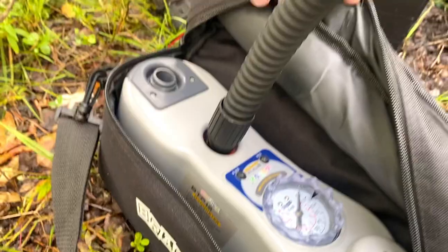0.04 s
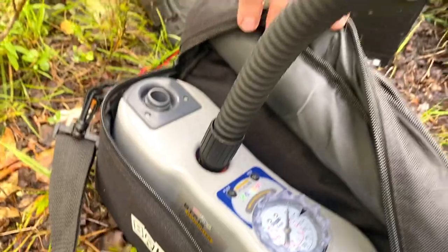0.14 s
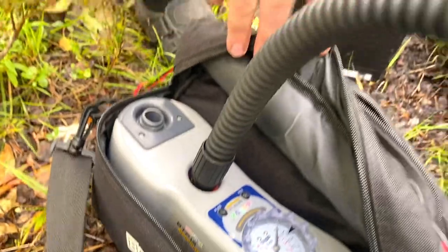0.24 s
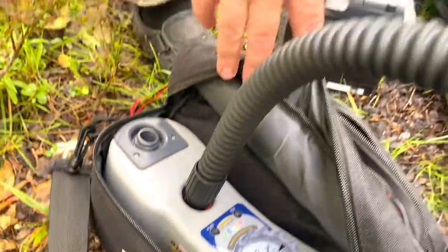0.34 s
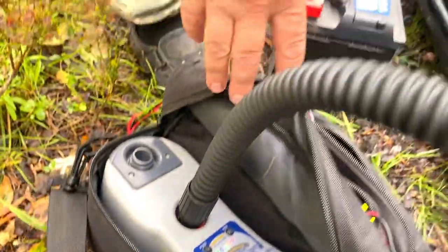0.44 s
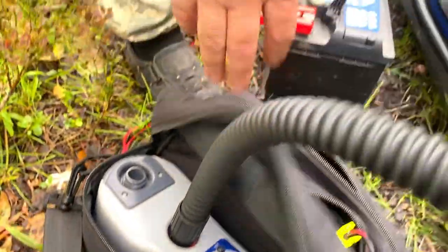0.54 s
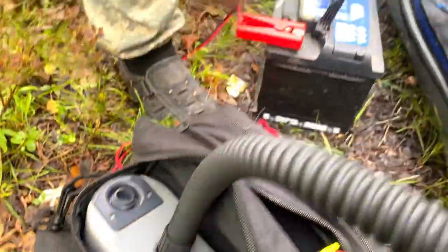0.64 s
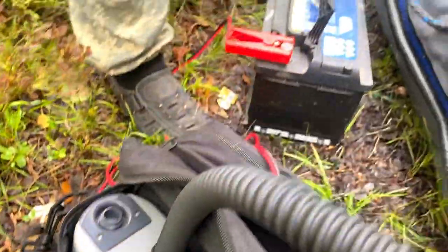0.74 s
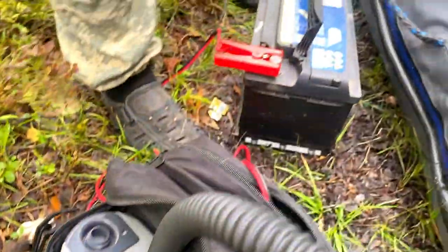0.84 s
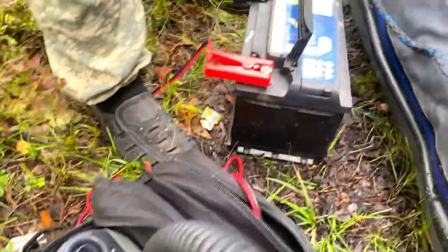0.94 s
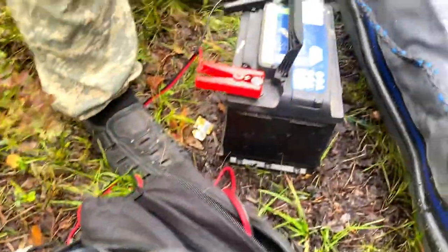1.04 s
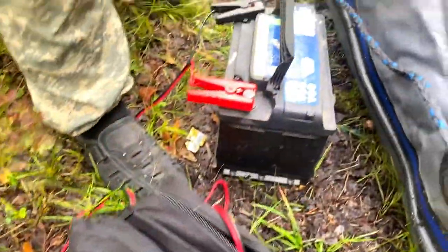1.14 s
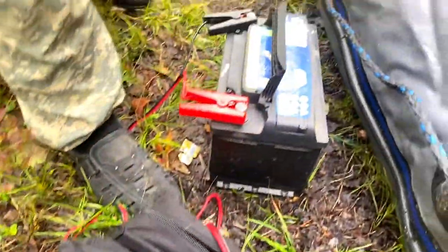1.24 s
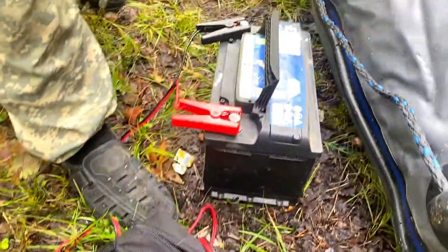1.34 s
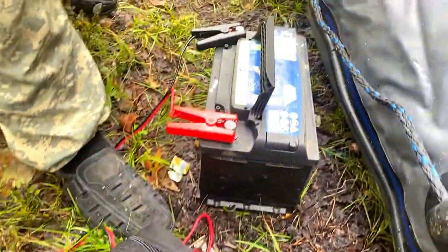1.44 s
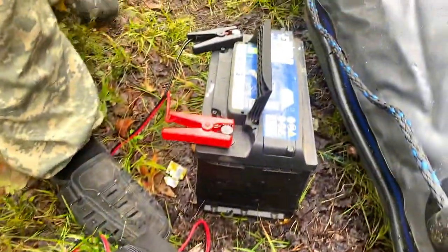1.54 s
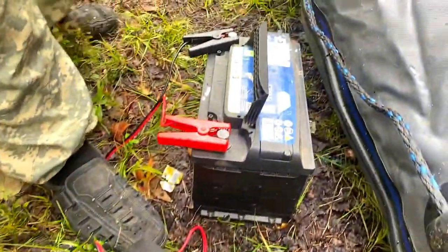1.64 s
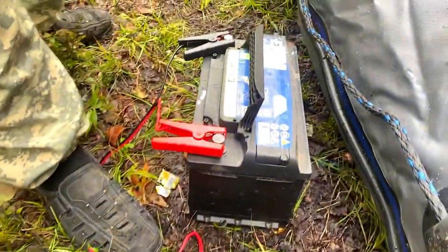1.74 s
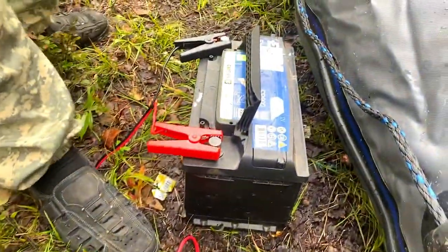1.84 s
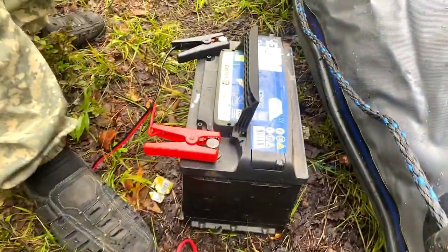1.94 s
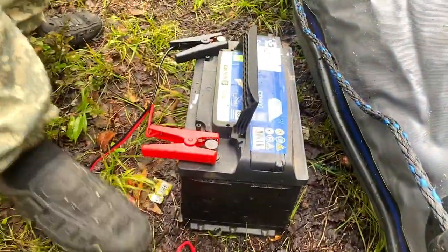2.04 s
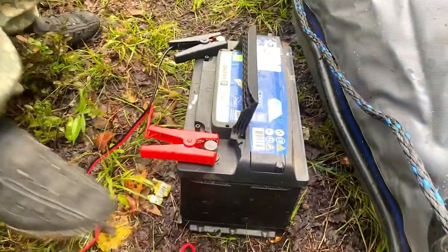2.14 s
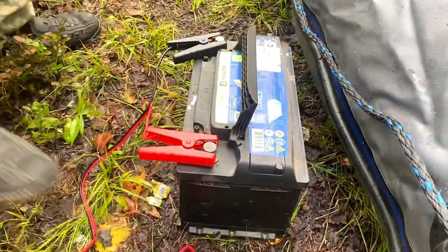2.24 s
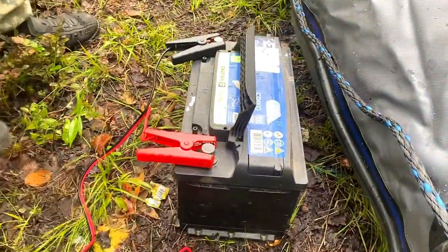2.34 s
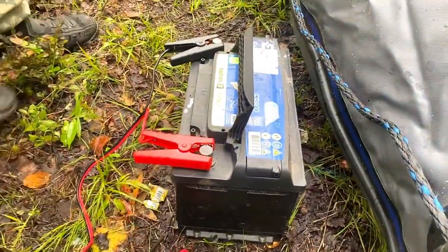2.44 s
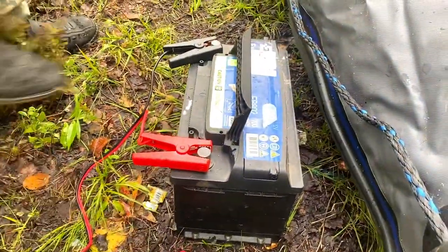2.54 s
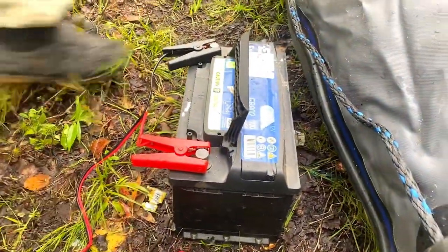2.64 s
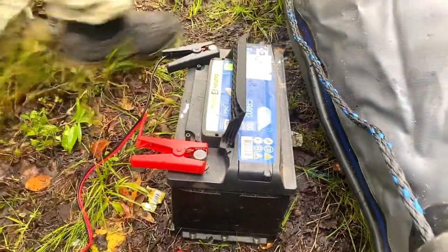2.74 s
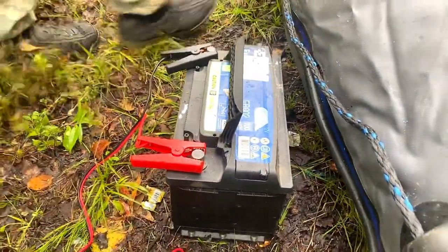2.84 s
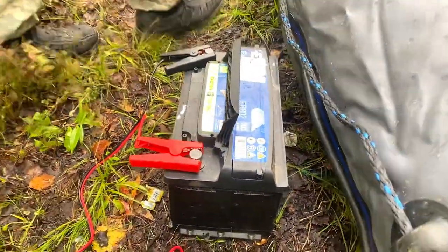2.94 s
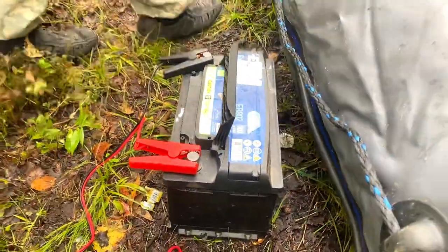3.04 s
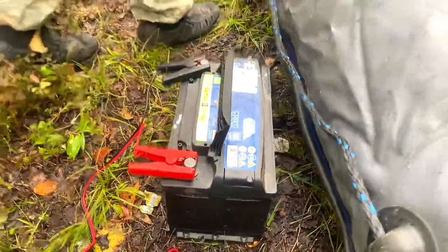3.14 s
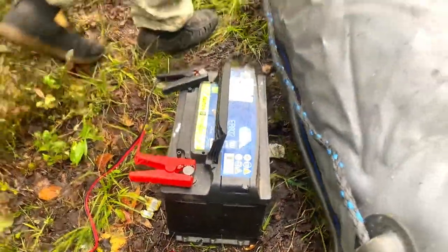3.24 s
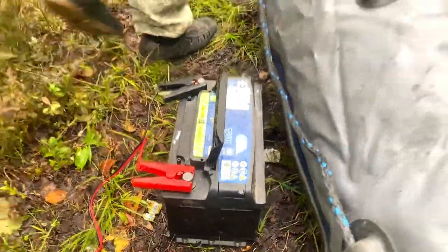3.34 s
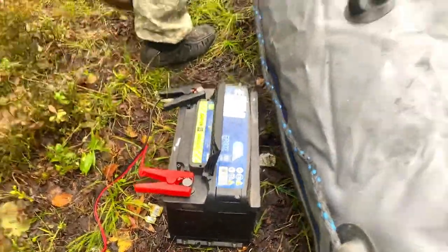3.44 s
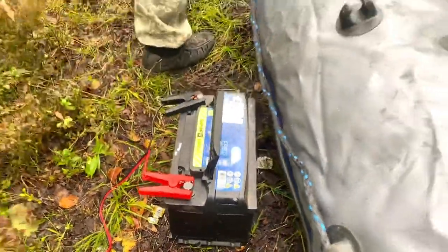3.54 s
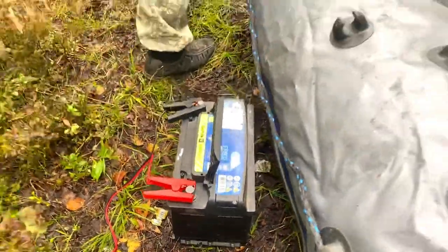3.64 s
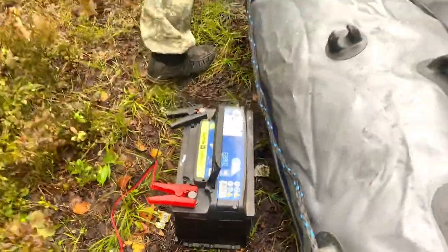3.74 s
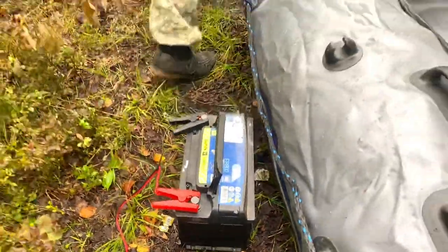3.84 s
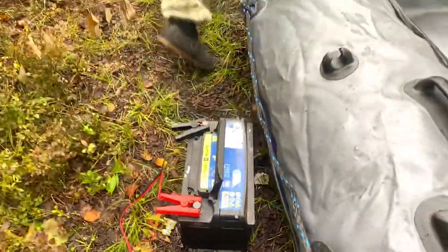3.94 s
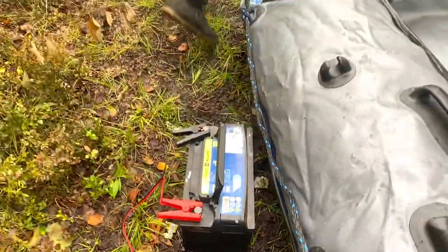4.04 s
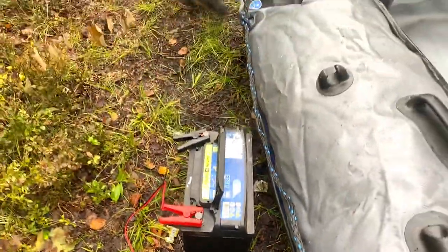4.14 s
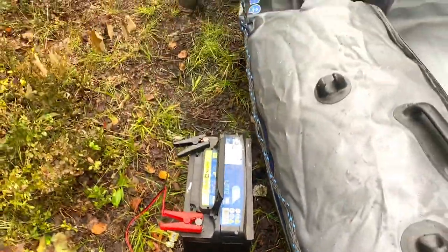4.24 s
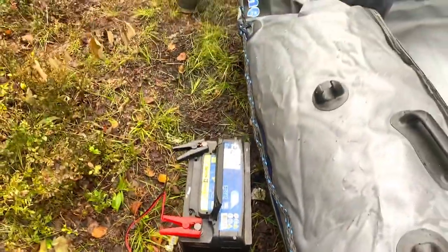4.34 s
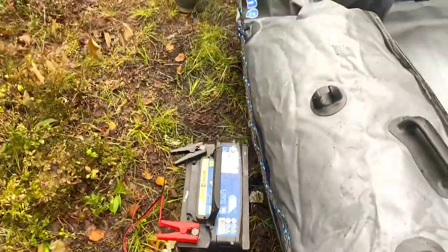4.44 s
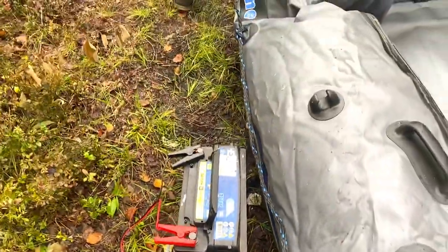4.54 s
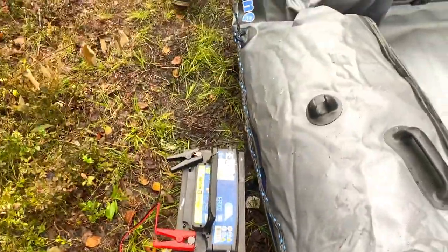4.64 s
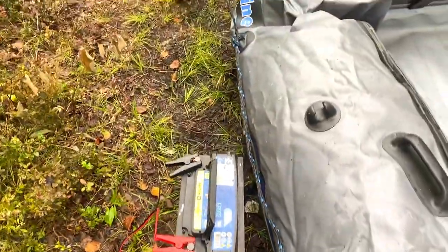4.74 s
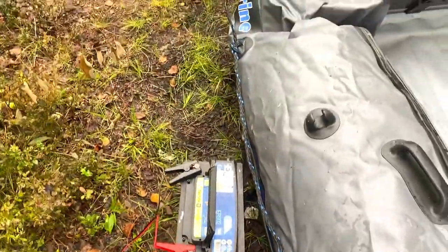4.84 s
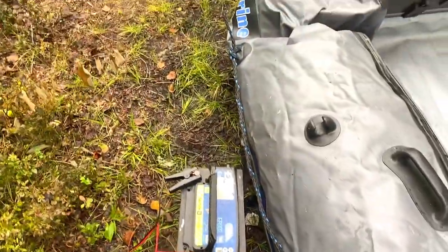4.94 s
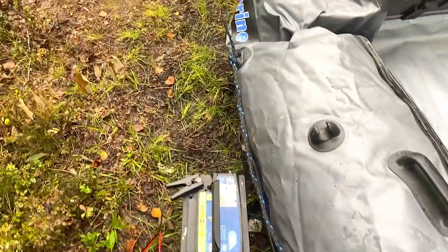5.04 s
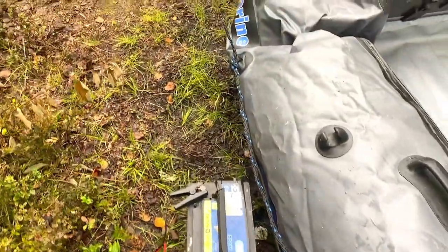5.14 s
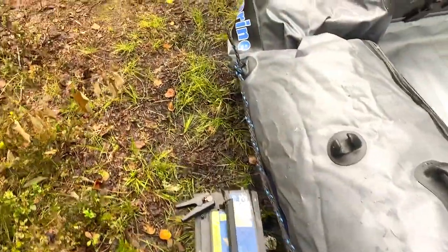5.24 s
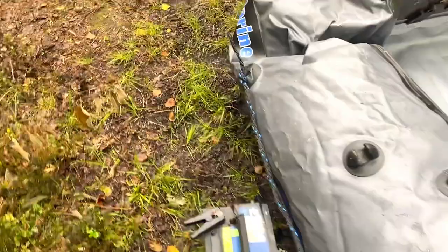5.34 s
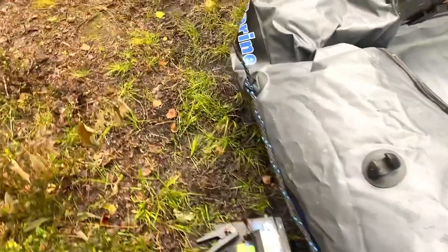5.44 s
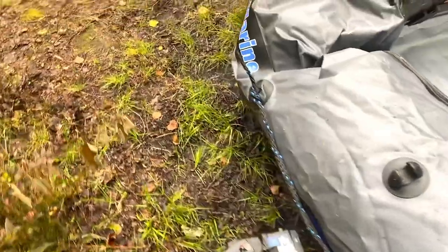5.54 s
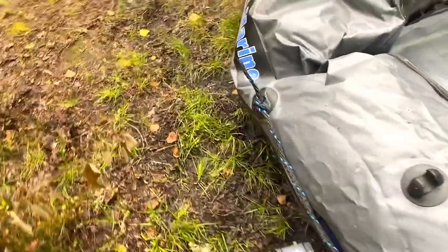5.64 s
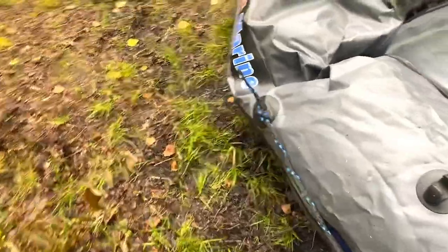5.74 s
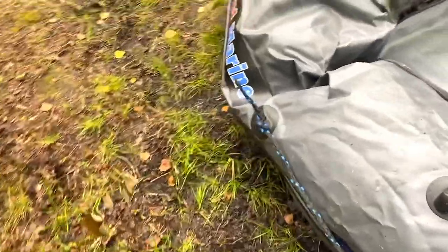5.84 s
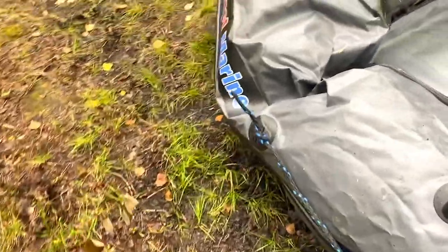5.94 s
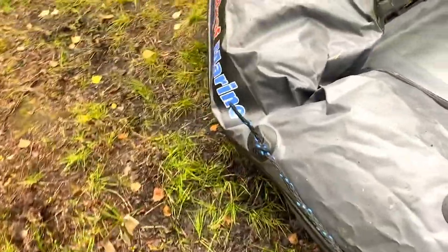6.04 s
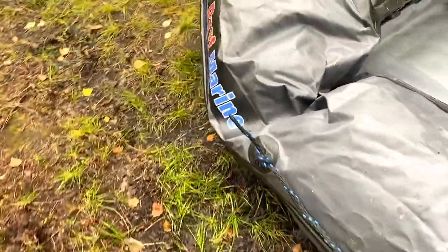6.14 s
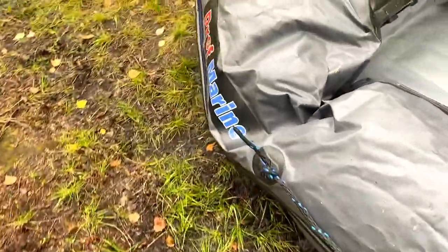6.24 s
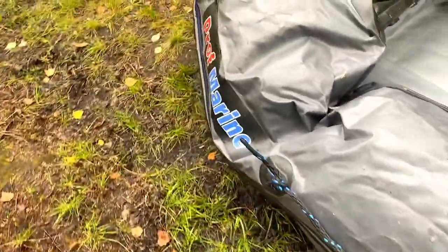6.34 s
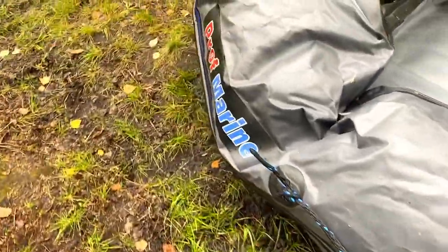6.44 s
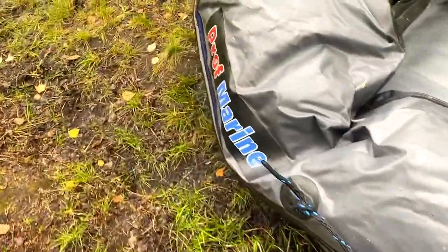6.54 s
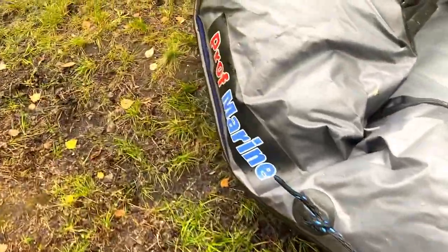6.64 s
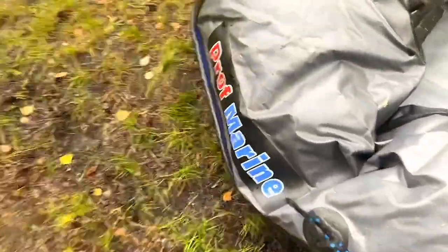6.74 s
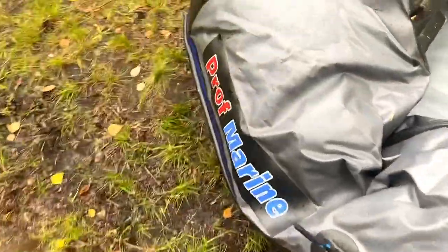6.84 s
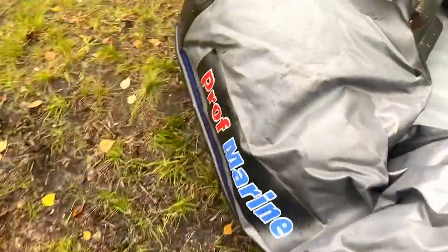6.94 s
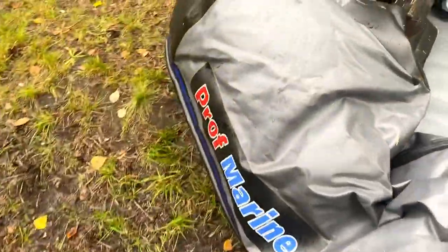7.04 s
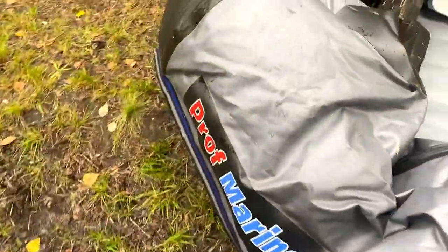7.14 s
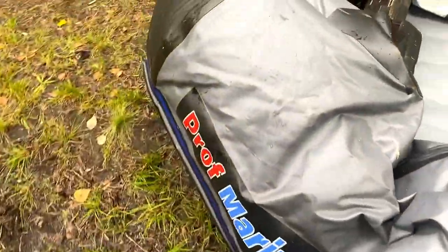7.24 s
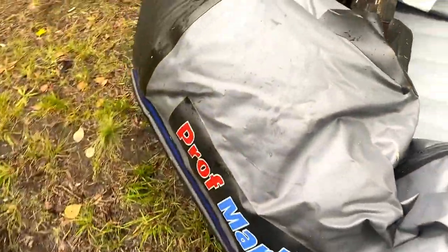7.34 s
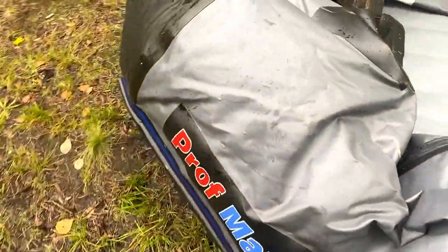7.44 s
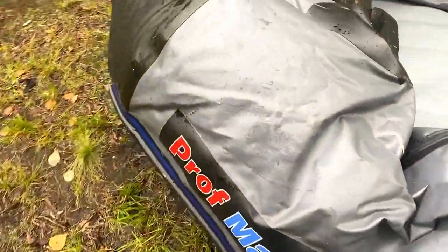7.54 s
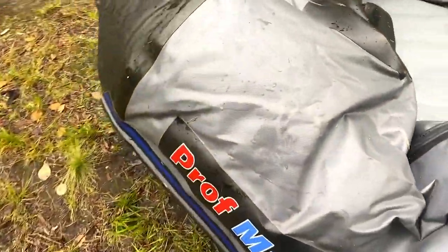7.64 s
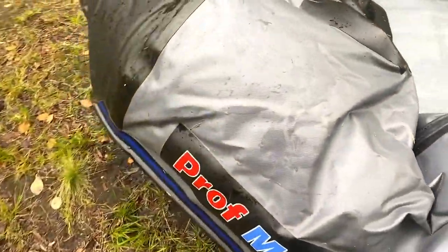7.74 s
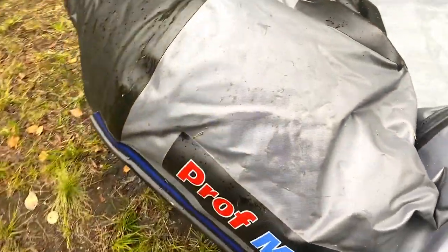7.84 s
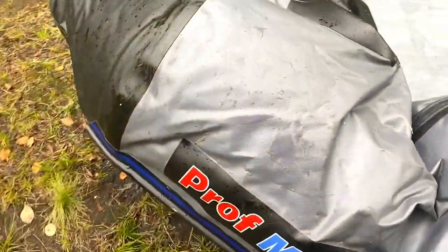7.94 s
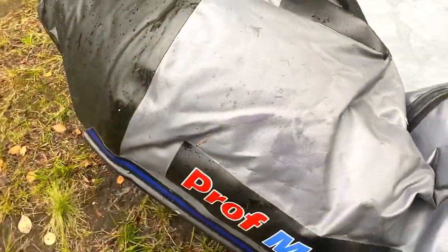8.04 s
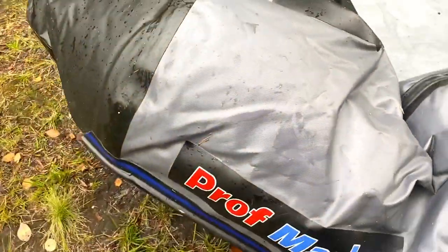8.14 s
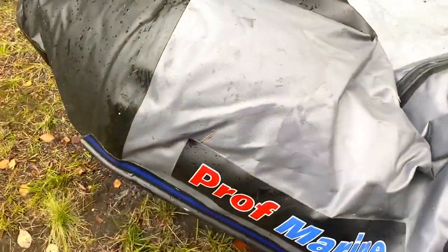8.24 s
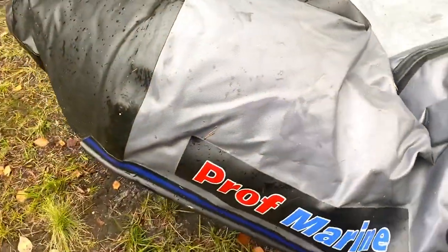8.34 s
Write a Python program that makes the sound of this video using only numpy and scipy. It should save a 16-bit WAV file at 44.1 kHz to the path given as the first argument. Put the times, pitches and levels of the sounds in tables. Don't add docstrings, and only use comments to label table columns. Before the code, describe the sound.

A small electric blower runs without stopping, outdoors on open grassy ground. At 0 seconds it is very close: a firm hum around 460 hertz, a hard nasal whine on its multiples, finer high singing, slight bearing rattle and broad air rushing through housing and ribbed hose. The pitch holds almost steady, while individual tones swell and thin as the handheld microphone swings. It dips slightly around 0.5, stays near until about 3, then recedes, clearly weaker and more fluttery from 6 onward. A boot brushes wet grass near 5.0, with a bright snap just after. Faint drags follow at 6.2 and 6.4, a tick at 6.8, then stronger abrupt scrapes and snaps from 7.2 to 7.4. Soft low wind bumps begin around 6.7; a gust buffets the microphone with dull irregular thumps around 7.8-8.2, with a last slow grass drag at 8. The pump is still running at the end, about 8.4.

```python
import sys
import numpy as np
from scipy import signal
from scipy.fft import rfft, irfft
from scipy.io import wavfile
from scipy.ndimage import uniform_filter1d

SR = 44100
rng = np.random.default_rng(int(sys.argv[2]) if len(sys.argv) > 2 else 0)


def ratio_of_db(decibels):
    return 10 ** (np.asarray(decibels, float) / 20)


def pcm_store(signal):
    levels = np.round(np.clip(np.atleast_2d(signal), -1, 1) * 32767)
    wavfile.write(sys.argv[1], SR, levels.astype(np.int16).T)


N = 370440
TIME = np.arange(N) / SR
FREQ = np.fft.rfftfreq(N, 1 / SR) + 1e-3
SHAFT_HZ, HOSE_HZ = 463, 713

# (multiple of the shaft [1], level at the nearest [dB], share of the nearness followed [1],
#  own extra way to ground [cm], own extra way to boat [cm])
STRONG_TONES = [(2.0, -37.7, 1.1, 1.43, 25.83), (3.0, -28.2, 0.82, 8.77, 20.69),
                (4.0, -28.5, 1.03, 8.35, 6.09), (5.0, -24.7, 1.13, 1.09, 10.52),
                (6.0, -41.6, 0.8, 2.87, 3.94), (7.0, -39.2, 1.3, 7.87, 6.76),
                (9.0, -44.7, 0.46, 0.72, 5.13), (18.0, -38.5, 0.95, 4.01, 0.32),
                (27.0, -38.2, 0.96, 1.16, 1.32), (4.5642, -37.0, 0.74, 3.32, 11.17),
                (5.4358, -39.5, 1.08, 1.5, 7.45), (6.5642, -34.9, 1.09, 10.66, 1.33)]


def columns(table):
    s, *rest = np.transpose(table)
    return [np.interp(TIME, s, c) for c in rest]


def colour_db(colour):
    hz, db = np.transpose(colour)
    return np.interp(np.log(FREQ), np.log(hz), db, -150, -150)


def noise(db, excite=None):
    if excite is None:
        excite = rng.standard_normal(N)
    x = irfft(rfft(excite) * ratio_of_db(db), N)
    return x / x.std()


def wander(rate):
    hold = int(SR / rate)
    levels = np.repeat(rng.standard_normal(N // hold + 1), hold)
    return 1.38 * uniform_filter1d(uniform_filter1d(levels, hold), hold)[:N]


def tone(angle, db):
    return np.sqrt(2) * ratio_of_db(db) * np.sin(angle + 2 * np.pi * rng.random())


def swells(rows):
    gain = 0
    for at, db, rise, fall in rows:
        below_peak_db = np.where(TIME < at, rise * (at - TIME), fall * (TIME - at))
        gain = gain + ratio_of_db(db - below_peak_db)
    return gain


def patchy(x, depth_db=1.5):
    frames = signal.stft(x, SR, nperseg=2048)[2]
    field = rng.standard_normal(frames.shape)
    field = uniform_filter1d(uniform_filter1d(field, size=7, axis=0), size=40, axis=1)
    return signal.istft(frames * ratio_of_db(depth_db * field / field.std()), SR, nperseg=2048)[1][:N]


def echoes_db(hz, ground_cm, boat_cm):
    turn = 2j * np.pi * hz / 34300
    ground_echo = 0.5 * np.exp(turn * ground_cm)
    boat_echo = 0.45 * np.exp(turn * boat_cm)
    return 20 * np.log10(abs(1 + ground_echo + boat_echo) + .03)


def flap():
    at, half_length = 0.19, 0.42
    return np.exp(-((TIME - at) / half_length) ** 4)


def wind(gusts):
    # (frequency [Hz], density [dB per Hz])
    wind_colour = [(20, -49), (35, -14), (70, 7.5), (130, 0), (200, -23), (400, -4)]
    breeze_db = -66.5
    return (ratio_of_db(breeze_db) + gusts) * ratio_of_db(1 + 1.3 * wander(20)) * noise(colour_db(wind_colour))


def thumps():
    # (time [s], peak level [dB], pitch [Hz], length [s])
    pockets = [(6.652, -41, 100.2, .012), (6.755, -37, 95, 0.014), (7.15, -35, 100, .015),
               (7.69, -35, 110, .012), (7.803, -35, 120, .008), (7.826, -31, 170, .006),
               (7.851, -35, 130, .004), (7.863, -24, 260, 0.002), (7.878, -24.5, 121, 0.0059),
               (7.893, -36, 250, 0.0074), (7.92, -25, 90, 0.004), (7.935, -47, 90, .005),
               (7.96, -18, 295, .0022), (7.997, -27, 117, 0.0063), (8.03, -41, 90, 0.0091),
               (8.09, -49, 120, .012), (8.152, -37, 90, 0.01), (8.191, -32, 200, 0.0032),
               (8.234, -36, 95, 0.0091)]
    out = np.zeros(N)
    for at, db, hz, length in pockets:
        near = abs(TIME - at) < 5 * length
        since = TIME[near] - at
        swell = np.exp(-.5 * (since / length) ** 2)
        out[near] += ratio_of_db(db) * swell * np.sin(2 * np.pi * hz * since + 0.96)
    return out


def boat_skin(near_db, gusts):
    # (frequency [Hz], density [dB per Hz])
    skin_colour = [(90, -32), (140, -2.5), (185, 4), (265, -2), (300, -5.5), (420, -46), (520, -49)]
    gust_db = -6
    skin = ratio_of_db(-46.5 + 0.83 * near_db) + ratio_of_db(gust_db) * gusts
    return skin * ratio_of_db(2.0) * noise(colour_db(skin_colour))


def grass():
    # (peak time [s], level [dB], rise [dB/s], fall [dB/s])
    drags = [
        (4.98, -35, 70, 97),
        (6.19, -54.5, 70, 200),
        (6.42, -43, 62, 40),
        (7.19, -47, 167, 100),
        (7.265, -30, 83, 220),
        (7.39, -30, 1498, 404),
        (7.45, -46, 60, 208),
        (7.99, -45, 53, 45),
    ]
    # (frequency [Hz], density [dB per Hz])
    grass_colour = [(1500, -13), (4000, -2), (6500, -9), (10000, -5.5), (13000, -3), (15600, -11)]
    # (time [s], peak level [dB], lowest frequency [Hz])
    stalks = [
        (5.075, -23, 6000),
        (6.802, -24, 9000),
        (7.186, -25, 7000),
        (7.243, -27, 3500),
        (7.288, -21, 3000),
        (7.398, -22, 1200),
        (8.038, -28, 6000),
    ]
    grain_db = 2.2 * np.minimum(rng.exponential(size=N), 4) + 2 * wander(80)
    grains = rng.standard_normal(N) * ratio_of_db(grain_db)
    out = swells(drags) * noise(colour_db(grass_colour), grains)
    for at, db, low_hz in stalks:
        since = np.maximum(TIME - at, 0)
        burst = (TIME > at) * np.exp(-since / 0.0029) * rng.standard_normal(N)
        highpass = signal.butter(2, min(low_hz, 14000), "high", fs=SR, output="sos")
        out += ratio_of_db(db) * signal.sosfilt(highpass, burst)
    return out


def pipes(near_db, hose_echo_db, treble_db):
    hose_db = -25.5 + 1.66 * near_db + hose_echo_db
    inlet_db = -37 + 1.4 * near_db - 21 * flap()
    hose = noise(-6 * ((FREQ - HOSE_HZ) / 128) ** 2)
    hose += ratio_of_db(-8.0) * noise(-6 * ((FREQ - 1.49 * HOSE_HZ) / 170) ** 2)
    inlet = noise(-6 * ((FREQ - 12200) / 1060) ** 2)
    shell = noise(-6 * ((FREQ - 5530) / 250) ** 2)
    return ratio_of_db(hose_db - 1.16) * hose + ratio_of_db(inlet_db + 3.0) * inlet + ratio_of_db(treble_db + 2.0) * shell


def rush(angle, band_db):
    # (low edge [Hz], high edge [Hz])
    rush_bands = [(1430, 1570), (4450, 5400), (9350, 10050)]
    # (frequency [Hz], density [dB per Hz])
    rush_colour = [(250, -75), (330, -63.5), (470, -54.5), (900, -56), (1250, -53.5), (1550, -50.5),
                   (2400, -53.5), (3600, -58), (4400, -57), (5200, -62), (6900, -69.5), (8300, -67),
                   (10700, -72.5), (15600, -78)]
    pulsing = noise(colour_db(rush_colour)) * (1 + 0.095 * np.sin(angle))
    air = rfft(patchy(pulsing))
    centres = np.log([lo * hi for lo, hi in rush_bands]) / 2
    out = 0
    for share, (lo, hi), heard_db in zip(np.eye(len(centres)), rush_bands, band_db):
        in_band = irfft(air * ((FREQ > lo) & (FREQ < hi)), N).std()
        part = irfft(air * np.interp(np.log(FREQ), centres, share), N)
        out = out + ratio_of_db(heard_db) / in_band * part
    return out


def shaft_hum(angle, hum_db):
    at, turn, length = 2.022, .75, .01
    slip = turn * np.clip((TIME - at) / length + .5, 0, 1)
    return tone(angle + slip, uniform_filter1d(hum_db, SR // 5) + .06 * wander(15))


def blade_whine(angle, near_db, ground_cm, boat_cm):
    flutter_db = .5 + .15 * np.maximum(-9 - near_db, 0)
    out = 0
    for k, db, share, to_ground, to_boat in STRONG_TONES:
        heard_db = db + share * near_db + echoes_db(k * SHAFT_HZ, ground_cm + to_ground, boat_cm + to_boat)
        out = out + tone(k * angle, heard_db + (flutter_db + (k > 5.5)) * wander(35))
    return out


def bearing(angle, near_db, rush_db):
    # (multiple of the shaft [1], cage turns added [1], level over the air rush [dB])
    weak_tones = [(8, 0, -6), (12, 0, -8), (14, 0, -8), (15, 0, -7), (17, 0, -2), (19, 0, -3), (20, 0, -9),
                  (21, 0, -12), (28, 0, -6), (29, 0, -10), (30, 0, -11), (2, -1, -6), (3, -1, -3),
                  (3, 1, -7), (4, -1, -5), (4, 1, -6), (4, 2, -7), (6, -1, -7), (5, 2, -11), (9, -1, -9),
                  (17, -1, -6), (17, 1, -12), (18, -1, -9), (25, -1, -9), (27, -1, -9)]
    cage_turns = .4358
    rattle_db = -50 + near_db + 8 * flap()
    out = sum(tone(k * angle, rattle_db + 1.8 * wander(2.571)) for k in range(22, 27))
    for k, turns, db in weak_tones:
        air_db = rush_db[0] - 2 if k < 10 else rush_db[2] + 1.5
        out += tone((k + turns * cage_turns) * angle, air_db + db + 2.2 * wander(3))
    return out


def scene():
    # (time [s], shaft speed as heard [Hz], hum level [dB], nearness [dB],
    #                    detour of the ground echo [cm], detour of the boat echo [cm])
    phone_walk = [(0.0, 463.38, -14.2, 0.0, 8.9, 24.1), (0.49, 463.6, -17.9, -2.8, 5.7, 24.7),
                  (0.99, 461.66, -16.5, -1.9, 3.6, 17.8), (1.48, 462.15, -16.4, -1.6, 4.3, 18.5),
                  (1.98, 462.92, -15.5, -1.5, 6.1, 21.3), (2.47, 462.52, -13.2, -1.3, 6.2, 21.0),
                  (2.96, 462.84, -14.3, -0.5, 6.5, 21.7), (3.46, 462.41, -15.6, -3.2, 9.6, 12.5),
                  (3.95, 462.89, -18.1, -4.9, 9.4, 13.2), (4.45, 462.69, -19.0, -6.0, 10.3, 13.1),
                  (4.94, 463.01, -17.3, -6.5, 10.5, 12.6), (5.44, 463.41, -15.1, -8.0, 8.2, 1.8),
                  (5.93, 462.86, -15.3, -10.7, 7.2, 7.8), (6.42, 463.09, -17.3, -13.1, 4.6, 7.4),
                  (6.92, 462.99, -19.4, -15.6, 4.7, 7.6), (7.41, 463.41, -21.0, -13.8, 5.8, 0.0),
                  (7.91, 462.7, -21.2, -13.9, 5.2, 6.5), (8.4, 462.2, -20.9, -14.8, 0.0, 1.6)]
    # (level at the nearest [dB], share of the nearness followed [1])
    rush_levels = [(-42.5, 0.35), (-41.5, 0.27), (-45, 0.87)]
    # (peak time [s], level [dB], rise [dB/s], fall [dB/s])
    gust_swells = [
        (3.2, -57, 2, 22),
        (5.5, -57, 19, 15),
        (6.7, -56, 13, 20),
        (7.17, -53, 34, 29),
        (7.98, -38, 47, 70),
    ]
    hz, hum_db, *moves = columns(phone_walk)
    near_db, ground_cm, boat_cm = (uniform_filter1d(move, SR // 8) for move in moves)
    speed_hz = uniform_filter1d(hz, SR // 8) + .04 * wander(25)
    angle = 2 * np.pi * np.cumsum(speed_hz) / SR
    band_db = [db + share * near_db for db, share in rush_levels]

    k, _, _, to_ground, to_boat = STRONG_TONES[1]
    low_db = band_db[0] + 0.18 * echoes_db(k * SHAFT_HZ, ground_cm + to_ground, boat_cm + to_boat)
    hose_echo_db = echoes_db(HOSE_HZ, ground_cm + .7, boat_cm + 6.1)

    gusts = swells(gust_swells)
    around = wind(gusts) + thumps() + boat_skin(near_db, gusts) + grass()
    air = pipes(near_db, hose_echo_db, band_db[2]) + rush(angle, [low_db, *band_db[1:]])
    rotor = shaft_hum(angle, hum_db) + blade_whine(angle, near_db, ground_cm, boat_cm)
    rotor += bearing(angle, near_db, band_db)
    return (around + air + rotor)[None]


def treble_reach(x):
    # (from [s], to [s], reach [Hz])
    wide_spells = [(0, .72, 15700), (1.85, 3.6, 14700), (3.6, 4.85, 13650), (4.9, 5.12, 15000),
                   (5.28, 5.56, 15800), (5.62, 5.85, 15700), (6.05, 6.66, 14700), (6.78, 6.82, 15700),
                   (7.05, 7.58, 16600), (7.58, 7.82, 14300), (7.82, 8.3, 16000)]
    usual_hz, least_hz, band_hz = 13100, 12900, 340
    hz, s, frames = signal.stft(x, SR, nperseg=2048)
    band = (hz // band_hz).astype(int)
    luck = 2 * rng.standard_normal((band.max() + 1, len(s)))[band] + rng.standard_normal(len(s))
    reach = np.full_like(luck, usual_hz)
    for start, end, top in wide_spells:
        reach += (top - usual_hz) * ((s >= start) & (s < end))
    reach += np.clip(.35 * (reach - usual_hz) + 150, 0, 420) * luck
    kept = hz[:, None] < np.maximum(reach, least_hz)
    return signal.istft(frames * kept, SR, nperseg=2048)[1][:, :N]


def top_cut(x):
    return signal.sosfilt(signal.butter(12, 15700, fs=SR, output="sos"), x)


def record(dry):
    bass_cut = signal.butter(2, 45, "high", fs=SR, output="sos")
    heard = treble_reach(signal.sosfilt(bass_cut, dry))
    return top_cut(heard)


dry = scene()
out = record(dry)
pcm_store(out)
```